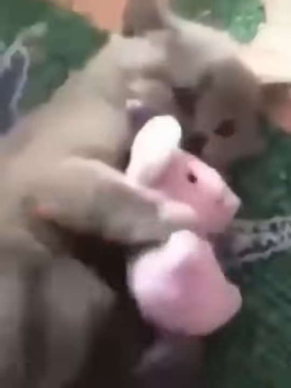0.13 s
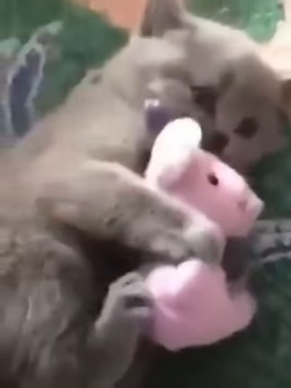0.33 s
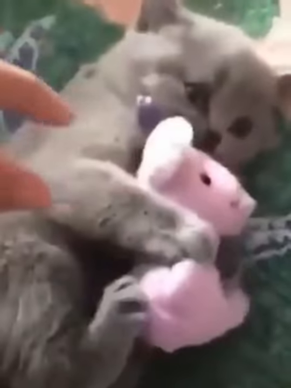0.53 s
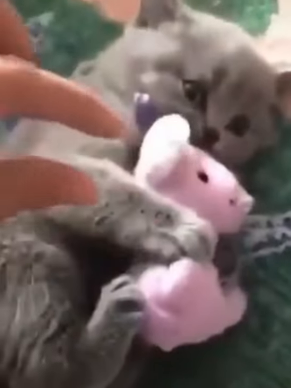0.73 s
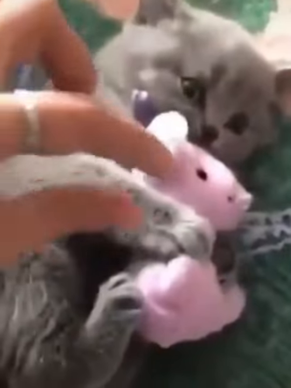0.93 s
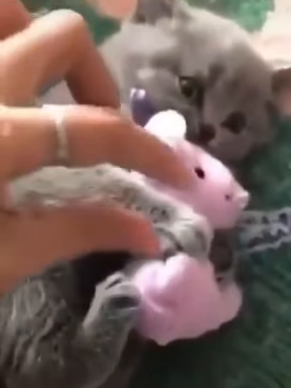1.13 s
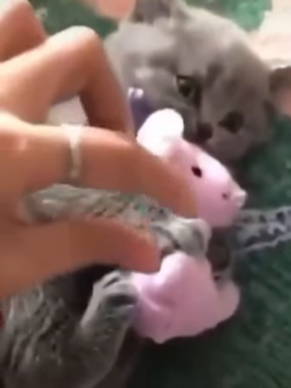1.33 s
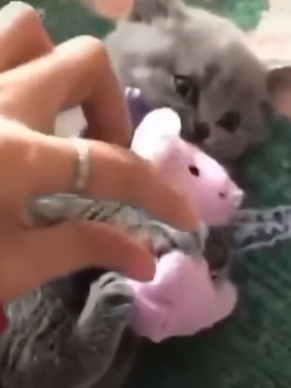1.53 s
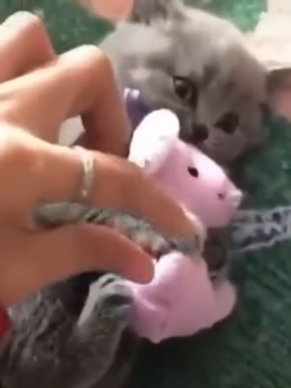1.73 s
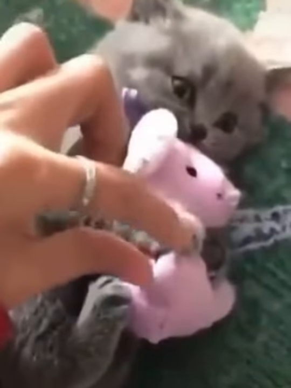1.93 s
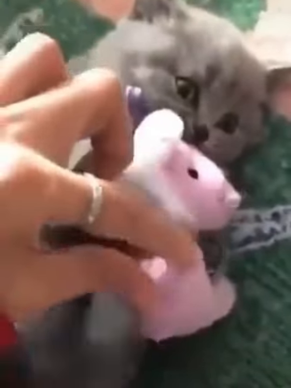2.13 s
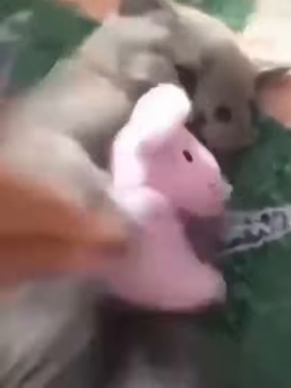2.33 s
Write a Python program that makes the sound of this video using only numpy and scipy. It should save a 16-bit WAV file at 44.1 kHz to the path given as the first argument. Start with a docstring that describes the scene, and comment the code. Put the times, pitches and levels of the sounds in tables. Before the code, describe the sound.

A cat gives one long hoarse yowl, growling, breaking into a wail, then sinking to a rasp

```python
"""A cat gives one long yowl close by in a small room, teased by a hand while it hugs a plush toy.
A hoarse growl breaks upward into a clear wail, which sinks as the mouth closes and ends in a rasp and a faint grunt.
The voice blends sine partials of the pitch, with half multiples for period doubling, and scattered pulses
coloured by the throat. Coloured noise makes the airy hiss, the soft low handling bumps and the room floor."""
import sys
import numpy as np
from scipy import signal
from scipy.fft import rfft, irfft
from scipy.io import wavfile
from scipy.ndimage import uniform_filter1d

SR = 44100
rng = np.random.default_rng(int(sys.argv[2]) if len(sys.argv) > 2 else 0)


def inscribe(sig):
    """Save sig as 16-bit PCM at rate SR to the path in sys.argv[1].

    A 1-D sig is mono; a 2-D sig holds one channel per row.
    Samples are clipped to [-1, 1] before scaling.
    """
    pcm = np.round(np.clip(np.atleast_2d(sig).T, -1, 1) * 32767)
    wavfile.write(sys.argv[1], SR, pcm.astype(np.int16))


N = 110250
TIME = np.arange(N) / SR

# Colour of the throat, shared by the growl partials and the hoarse pulses: (frequency [Hz], relative level [dB])
THROAT_COLOUR = [(120, -53), (235, -21), (275, -2.5), (370, -1), (550, 5.5), (760, 0), (1000, 0.5),
                 (1250, -6.5), (1480, -18), (1900, -22), (2400, -31.5), (3400, -30.5), (4200, -46.5),
                 (8000, -53.5)]
# Random pitch wander: spread as a share of the pitch, steady and extra when rough, and its corner rate
JITTER, ROUGH_JITTER, JITTER_RATE_HZ = 0.004, .028, 70


def from_db(db):
    """Decibels to amplitude gain."""
    return 10 ** (np.asarray(db) / 20)


def rms_one(x):
    """Scale to unit power."""
    return x / np.sqrt(np.mean(x ** 2) + 1e-20)


def in_time(rows):
    """Draw a control curve at every sample by straight lines between its points."""
    s, value = np.transpose(rows)
    return np.interp(TIME, np.sort(s), value)


def at_hz(points, hz):
    """Read a colour table on a log-frequency axis."""
    f, db = np.transpose(points)
    return np.interp(np.log(np.maximum(hz, 1)), np.log(f), db)


def drift(rate_hz):
    """Smooth random wander of spread 1: white noise through a two-pole low-pass."""
    r = np.exp(-2 * np.pi * rate_hz / SR)
    wander = signal.lfilter([1], [1, -2 * r, r * r], rng.standard_normal(N + SR))
    return rms_one(wander[SR:])  # drop the filter's first second


def colour(x, points):
    """Causal (minimum-phase) filter with the given colour; unit power."""
    size = 2 * N
    cepstrum = irfft(np.log(from_db(at_hz(points, np.arange(N + 1) * SR / size))))
    # Folding the cepstrum onto its causal half gives the minimum phase
    cepstrum[1:N] *= 2
    cepstrum[N + 1:] = 0
    response = np.exp(rfft(cepstrum))
    return rms_one(irfft(rfft(x, size) * response)[:N])


def noise(points):
    """Coloured noise of unit power."""
    return colour(rng.standard_normal(N), points)


def room_floor():
    """Steady room noise, weighted to the bass."""
    # Colour of the room noise: (frequency [Hz], relative level [dB])
    floor_colour = [(20, 2), (45, 6), (120, -5), (200, -12), (320, -10.5), (550, -9.5), (900, -18),
                    (2000, -23), (4000, -29), (10000, -41.5)]
    floor_db = -62.5
    return from_db(floor_db) * noise(floor_colour)


def handling():
    """Soft low swells as the hands move: bass noise under bell-shaped power curves."""
    # Bumps: (centre time [s], peak level [dB], time for the power to fall to 1/e [s])
    bumps = [(0.281, -55, .06), (0.423, -56, 0.03), (0.539, -52.5, 0.03), (0.842, -59.5, 0.058),
             (1.338, -60, 0.21), (1.852, -53.5, 0.042), (2.354, -57, 0.044), (2.44, -62.5, 0.099)]
    # Colour of the bumps: (frequency [Hz], relative level [dB])
    bump_colour = [(20, -16), (40, -19), (58, -1), (78, 3.5), (98, -3), (140, -6), (220, -17), (400, -20.5),
                   (1500, -61)]
    power = sum(from_db(db) ** 2 * np.exp(-((TIME - s) / length) ** 2) for s, db, length in bumps)
    return np.sqrt(power) * noise(bump_colour)


def hiss():
    """Bright turbulent air, strongest during the growl."""
    # Hiss before the overall lift: (time [s], level [dB])
    hiss_level = [(0.25, -86), (0.29, -62.5), (0.37, -79.5), (0.43, -64.5), (0.49, -70.5), (0.522, -52.5),
                  (0.55, -59.5), (0.6, -69.5), (0.81, -68.5), (0.84, -77), (0.89, -66), (0.93, -72.5),
                  (1.3, -77), (1.85, -86), (2.05, -77.5), (2.3, -89)]
    # Colour of the hiss: (frequency [Hz], relative level [dB])
    hiss_colour = [(1500, -1), (2800, 5), (4200, 0), (6500, -0.5), (9500, -0.5), (11000, -5.5)]
    lift_db = 2
    return from_db(in_time(hiss_level) + lift_db) * noise(hiss_colour)


def squeak():
    """A brief rising whistle in the throat as the snarl drops into the growl: one jittered sine."""
    # Whistle: (time [s], pitch before jitter [Hz], level [dB])
    whistle = [(0.449, 1430, -75), (.465, 1518, -51), (0.479, 1604, -46.5), (0.499, 1590, -67)]
    s, hz, db = np.transpose(whistle)
    pitch = np.interp(TIME, s, hz) * (1 + JITTER * drift(JITTER_RATE_HZ))
    sounding = (TIME > s[0]) * (TIME < s[-1])
    level = from_db(np.interp(TIME, s, db)) * sounding
    return level * np.sin(2 * np.pi * np.cumsum(pitch) / SR)


def mouth_db(hz, lift_db):
    """Closing the mouth dulls the overtones and leaves a resonance near 1 kHz; a narrow dip stays in place."""
    # How the mouth's lift spreads over the spectrum: (frequency [Hz], share of the lift [factor])
    mouth_share = [(280, -0.084), (420, -0.31), (620, -0.35), (830, -0.73), (1080, -0.6), (1400, 0.72),
                   (1800, 0.3), (6000, 0.044)]
    # Overtones fade as they glide through this dip
    notch_hz, notch_width_hz, notch_db = 2100, 50, -16
    notch = notch_db * np.exp(-((hz - notch_hz) / notch_width_hz) ** 2)
    return lift_db * at_hz(mouth_share, hz) + notch


def strength(partials, multiple):
    """Gain of one partial against the register's strongest; zero if the register lacks it."""
    multiples, db = np.transpose(partials)
    present = np.round(2 * multiples) == 2 * multiple
    return np.sum(from_db(db - db.max()) * present)


def clean_tone(pitch, cycles, lift_db, rough, count=20):
    """Whole and half multiples of the pitch, blended between registers; halves mean every second cycle differs."""
    # Register of the folds: (time [s], register [0 growl, 1 plain, 2 split, 3 doubled])
    register_curve = [(.88, 0), (.91, 1), (1.08, 1), (1.10, 2), (1.21, 2), (1.26, 1.45), (1.35, 1.6),
                      (1.372, 3), (2.1, 3), (2.22, 2.3)]
    # Partials of three registers: (multiple of the pitch [factor], relative level [dB])
    plain = [(1, 0), (2, -7.5), (3, -17), (4, -33), (5, -37), (6, -36), (7, -45)]
    split = [(0.5, -23), (1, 0), (1.5, -10.5), (2, -10), (2.5, -17), (3, -21), (3.5, -19), (4, -35),
             (4.5, -35), (5, -43), (6, -46), (6.5, -44), (7.5, -45), (8, -43), (9, -41), (10, -45)]
    doubled = [(0.5, -23), (1, 0), (1.5, -3), (2, -12.5), (2.5, -13.5), (3, -32), (3.5, -18), (4, -41),
               (4.5, -37), (5, -34), (5.5, -38), (6, -36), (6.5, -44), (7, -46)]
    # Each partial flutters on its own, more when rough
    flutter_db, rough_flutter_db, flutter_rate_hz = 1.6, 1.8, 14
    register = np.clip(in_time(register_curve), 0, 3)
    out, power = 0, 0
    for k in range(1, count + 1):
        hz = pitch * k / 2
        growl_gain = from_db(at_hz(THROAT_COLOUR, hz)) * (k % 2 == 0)  # whole multiples only
        gains = [growl_gain] + [strength(partials, k / 2) for partials in (plain, split, doubled)]
        gain = sum(g * np.maximum(1 - np.abs(register - i), 0) for i, g in enumerate(gains))
        flutter = (flutter_db + rough_flutter_db * rough) * drift(flutter_rate_hz)
        gain = gain * from_db(mouth_db(hz, lift_db) + flutter)
        out = out + gain * np.cos(np.pi * k * cycles + 2 * np.pi * rng.random())
        power = power + gain ** 2 / 2
    return out / np.sqrt(power)


def hoarse_tone(cycles, lift_db):
    """Uneven slaps of the folds and puffs of air ring in the throat; the level is evened out."""
    # Pulse timing spread [cycles], pulse level spread [dB], air against the pulses [amplitude factor]
    pulse_scatter, pulse_spread_db, breath_share = .19, 1, .5
    air = rms_one(rng.standard_normal(N) * (1 + np.cos(2 * np.pi * cycles)))
    chance = rng.standard_normal((N // 20, 2))[:int(cycles[-1])]  # one row per cycle
    moments = np.arange(len(chance)) + pulse_scatter * chance[:, 0]
    at = np.interp(moments, cycles, np.arange(N)).astype(int)
    pulses = np.bincount(at, from_db(pulse_spread_db * chance[:, 1]), N)
    rest = colour(rms_one(pulses) + breath_share * air, THROAT_COLOUR)
    out = 0
    # Peel off bands from the bottom, each with the mouth's gain at one frequency: (that frequency, upper edge) in Hz
    for hz, edge in ((600, 750), (850, 1000), (1300, 1200), (1800, 1500)):
        low = signal.sosfiltfilt(signal.butter(6, edge, fs=SR, output="sos"), rest)
        out = out + low * from_db(mouth_db(hz, lift_db))
        rest = rest - low
    out = out + rest * from_db(lift_db)
    return out / np.sqrt(uniform_filter1d(out ** 2, size=300) + 1e-12)


def rattle(rough):
    """Loose tissue in the throat beats unevenly on the level of the hoarse voice."""
    rate_hz, wander, full_depth = 77, .15, .22
    turns = np.cumsum(rate_hz * (1 + wander * drift(rate_hz / 2))) / SR
    depth = full_depth * rough
    return (1 + depth * np.cos(2 * np.pi * turns)) / np.sqrt(1 + depth ** 2 / 2)


def lips(x):
    """Shut lips pass only the lowest resonance; the rest comes through as they part."""
    # Parting of the lips, as gain of all above the lowest resonance: (time [s], level [dB])
    parting = [(.215, -27), (.24, -6), (.255, 0), (2.21, 0.5), (2.29, -11)]
    shut_lips_hz = 610
    low = signal.sosfiltfilt(signal.butter(4, shut_lips_hz, fs=SR, output="sos"), x)
    return low + (x - low) * from_db(in_time(parting))


def yowl():
    """One voice that passes between hoarse and clean; hoarseness also shakes pitch and level."""
    # Pitch of the vocal folds before jitter, part by part: (time [s], pitch [Hz])
    snarl_pitch = [(.21, 243.9), (.252, 260.9), (.268, 282.8), (.285, 269.7), (.31, 306.8), (.38, 323.6),
                   (.41, 337.6), (.43, 437), (.465, 474)]
    growl_pitch = [(.49, 378.9), (.515, 342), (.55, 324.5), (.6, 304), (.645, 286), (.67, 320.8),
                   (.70, 292.7), (.74, 332.5), (.78, 330)]
    wail_pitch = [(.80, 478), (.825, 527), (.84, 488), (.862, 548), (.888, 508), (.902, 580), (.925, 578),
                  (.95, 601), (.985, 553), (1.01, 590), (1.09, 602), (1.2, 580), (1.355, 562), (1.38, 542),
                  (1.48, 529), (1.66, 525), (1.81, 500), (1.945, 422), (2.0, 414), (2.07, 392)]
    rasp_pitch = [(2.10, 394.8), (2.15, 355.6), (2.19, 357.9), (2.22, 384.1), (2.29, 480), (2.36, 434.5)]
    # Vocal effort of the call and of the closing grunt, ahead of the lips: (time [s], level [dB])
    call_effort = [(0.21, -86), (0.22, -39.5), (0.243, -45), (0.254, -34.5), (0.31, -36.5), (0.33, -43.5),
                   (0.357, -47.5), (0.39, -39), (0.49, -40.5), (0.525, -38), (0.73, -42), (0.82, -37.5),
                   (0.92, -35.5), (0.965, -38.5), (1.0, -34), (1.03, -38), (1.11, -35.5), (1.17, -36),
                   (1.26, -34), (1.3, -36.5), (1.76, -39), (1.81, -35.5), (1.9, -36), (1.94, -37),
                   (2.03, -35.5), (2.215, -43), (2.24, -61.5)]
    grunt_effort = [(2.273, -62), (2.30, -56.5), (2.354, -56), (2.38, -92), (2.5, -95)]
    # Irregular pulses against the clean tone: (time [s], level [dB])
    hoarseness = [(.22, -2), (.26, -9), (.31, -6), (.36, 4), (.44, 2), (.52, -8), (.58, -4), (.66, -2),
                  (.70, -6), (.78, 2), (.82, -6), (.89, -6), (.935, -22), (.99, -20), (1.06, -35),
                  (1.75, -29), (1.82, -21), (1.98, -24), (2.095, -8), (2.12, 2), (2.17, -1), (2.22, -5)]
    # Mouth opening, as lift of the overtones: (time [s], level [dB])
    mouth_lift = [(.22, -9.5), (.27, -1.5), (.33, 4.5), (.47, -0.5), (.52, 2.5), (.58, 2.5), (.78, 7),
                  (.86, 3.5), (.95, 2.5), (1.15, 0.5), (1.3, -5), (1.4, -1.5), (1.65, -3), (1.8, -5.5),
                  (1.92, -11), (2.05, -14.5), (2.2, -11)]
    # Breathiness against the tone: (time [s], level [dB])
    breathiness = [(1.05, -39), (1.7, -41.5), (1.85, -29), (2.1, -35.5)]
    # Colour of the breath: (frequency [Hz], relative level [dB])
    breath_colour = [(300, -16), (900, 3), (1800, 3.5), (2600, 0), (3400, -7.5), (4200, -27.5),
                     (9000, -28.5)]
    # Fast level wander of the clean tone; unsteady is the share that stays in the clear wail
    shimmer, shimmer_rate_hz, unsteady = 0.095, 160, 0.12

    hoarse = from_db(in_time(hoarseness))
    # Equal-power shares of the two tones
    rough = hoarse / np.hypot(1, hoarse)
    clean = 1 / np.hypot(1, hoarse)
    pitch = in_time(list(snarl_pitch) + list(growl_pitch) + list(wail_pitch) + list(rasp_pitch))
    pitch = pitch * (1 + (JITTER + ROUGH_JITTER * rough) * drift(JITTER_RATE_HZ))
    cycles = np.cumsum(pitch) / SR
    lift_db = in_time(mouth_lift)
    effort = from_db(in_time([(.19, -100)] + list(call_effort) + list(grunt_effort)))
    tone = clean_tone(pitch, cycles, lift_db, rough)
    tone = tone * (1 + shimmer * (rough + unsteady) * drift(shimmer_rate_hz))
    voice = (clean * tone + rough * hoarse_tone(cycles, lift_db)) * rattle(rough)
    breath = from_db(in_time(breathiness)) * noise(breath_colour)
    return effort * lips(voice + breath)


def room(x):
    """The short tail of a furnished room: the sound convolved with decaying coloured noise."""
    # Tail against the direct sound; the toy shields the mouth's overtones: (frequency [Hz], level [dB])
    tail_colour = [(560, -16), (1100, -10), (1800, -4), (3500, -5), (9000, -8)]
    t60_s, gap_s = .25, .003
    tail = noise(tail_colour) * from_db(-60 * TIME / t60_s) * (TIME > gap_s)
    # Scale the tail's energy to the mean power of its colour
    power = np.mean(from_db(at_hz(tail_colour, np.linspace(0, SR / 2, N))) ** 2)
    return signal.fftconvolve(x, tail * np.sqrt(power / np.sum(tail ** 2)))[:N]


def scene():
    """The cat in its room, over bumps and room noise."""
    cat = yowl() + squeak() + hiss()
    return (cat + room(cat) + handling() + room_floor())[None]


def record(dry):
    """A steep elliptic low-pass cuts the top."""
    cutoff_hz = 10900
    return signal.sosfilt(signal.ellip(10, .2, 60, cutoff_hz, fs=SR, output="sos"), dry)


dry = scene()
out = record(dry)
inscribe(out)
```